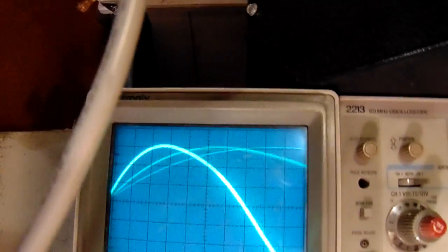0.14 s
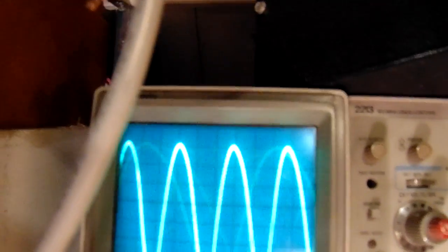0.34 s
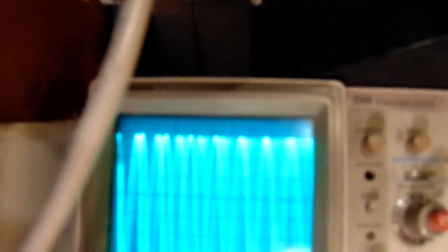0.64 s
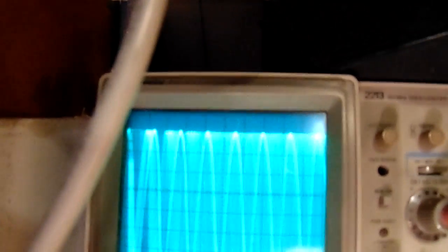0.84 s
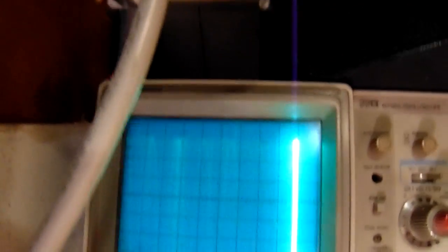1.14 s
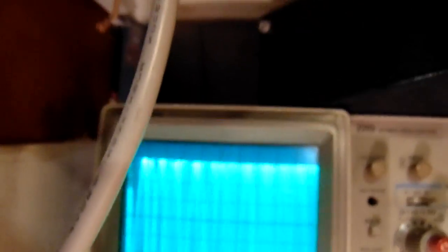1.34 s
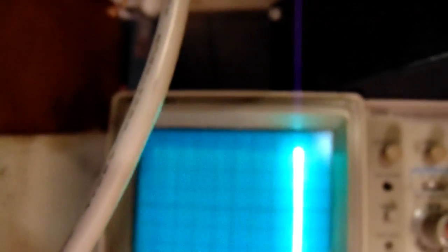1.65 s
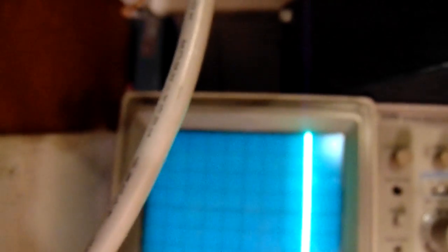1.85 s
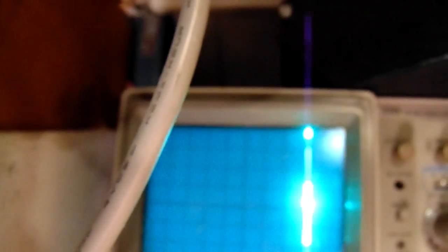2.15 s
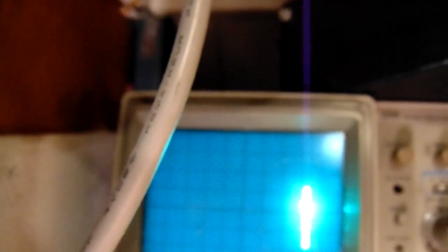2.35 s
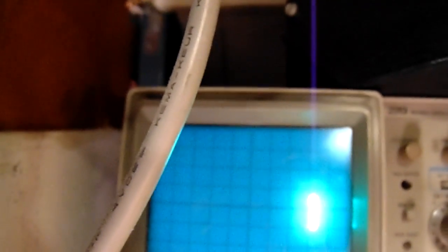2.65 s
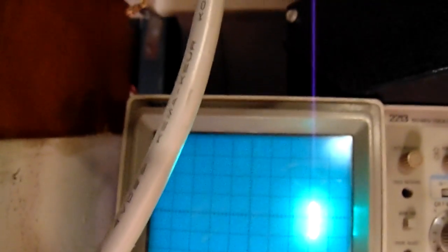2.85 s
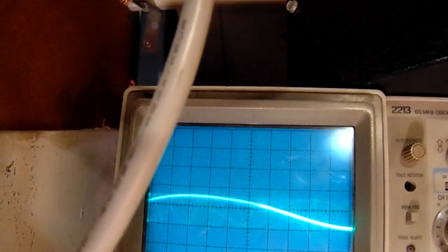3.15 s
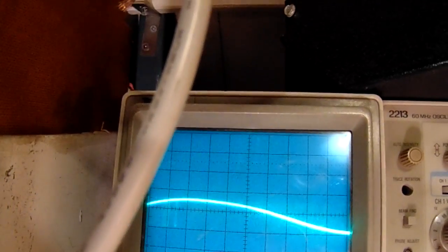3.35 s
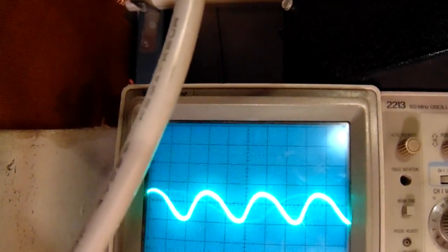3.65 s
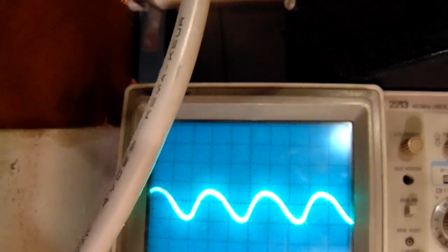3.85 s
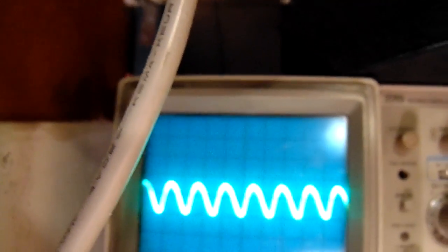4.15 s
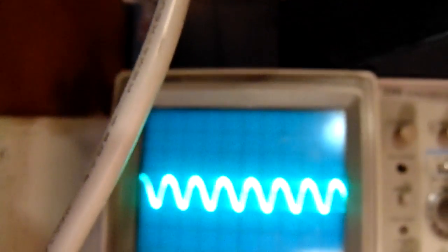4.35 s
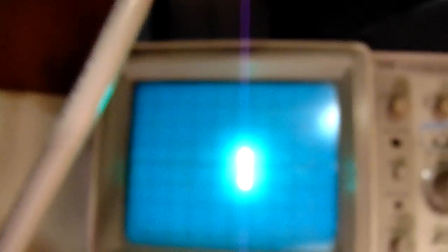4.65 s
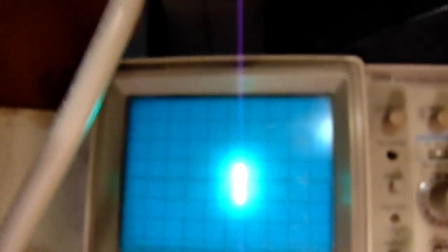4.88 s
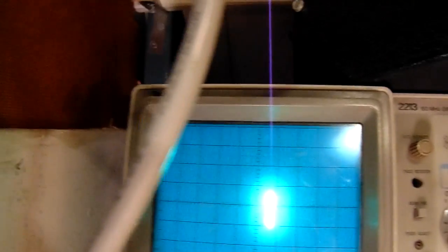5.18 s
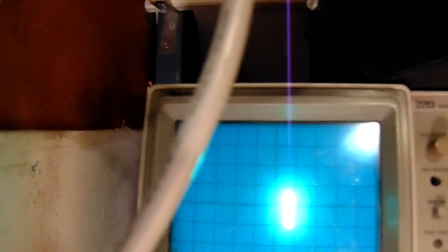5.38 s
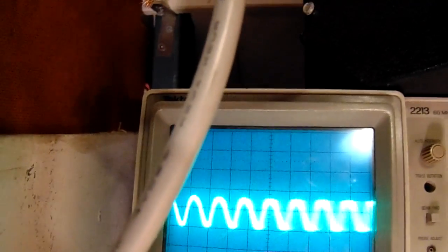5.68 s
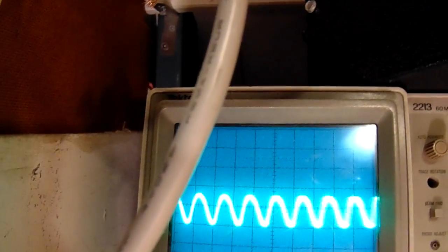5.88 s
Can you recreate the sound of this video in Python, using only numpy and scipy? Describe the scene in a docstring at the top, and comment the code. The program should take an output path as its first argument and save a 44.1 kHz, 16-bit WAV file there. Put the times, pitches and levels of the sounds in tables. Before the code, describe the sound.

Stiff detented knobs on electronic test equipment snap in small irregular groups, metal case ringing, over faint motor flutter and room noise in a quiet workshop.

```python
"""Rotary switches in a quiet workshop

Two detented oscilloscope switches are turned, close by: each step scrapes, snaps and rings the panel and metal case.
Filtered noise makes the dense panel ring; decaying sines make the spring, the case and the pings of touched parts.
Fingertips tick on the knobs and rub their ridges; repeated kicks make a small motor flutter on and off.
Faint room noise and a thin whine, both shaped from noise, lie beneath."""
import sys
import numpy as np
from scipy import signal
from scipy.io import wavfile
from scipy.ndimage import uniform_filter1d

SR = 44100
rng = np.random.default_rng(int(sys.argv[2]) if len(sys.argv) > 2 else 0)


def to_wav(sig):
    """Store sig (one row per channel, or 1-D mono) as 16-bit WAV at the path in sys.argv[1].

    Samples outside -1..1 are clipped; the rate is SR.
    """
    pcm = np.clip(np.atleast_2d(sig), -1, 1) * 32767
    pcm = np.round(pcm).astype(np.int16)
    wavfile.write(sys.argv[1], SR, pcm.T)  # frames by channels


N = 265437

TIME = np.arange(N) / SR  # s
AGE = TIME[:SR // 2]  # s since the start of one event
CUTOFF_HZ = 14200
# edges and centres of the noise bands: (pitch_hz)
EDGES = 20 * 2 ** np.linspace(0, 9.6, 27)
CENTRES = np.sqrt(EDGES[1:] * EDGES[:-1])


def from_db(db):
    """Decibels to gain."""
    return 10 ** (np.asarray(db) / 20)


def rms_one(x):
    """Scale each row to an rms of one."""
    return x / np.sqrt(np.mean(x ** 2, axis=-1, keepdims=True) + 1e-20)


def band_pass(x, low_hz, high_hz, order=2):
    """Keep the range between two frequencies."""
    sos = signal.butter(order, [low_hz, high_hz], "band", fs=SR, output="sos")
    return signal.sosfilt(sos, x)


def add(out, s, sound):
    """Mix a sound in at time s."""
    start = max(round(s * SR), 0)
    out[start:start + len(sound)] += sound[:max(N - start, 0)]


def at_bands(points):
    """Read (Hz, value) points at the band centres, along a logarithmic pitch axis."""
    hz, value = np.transpose(points)
    return np.interp(np.log(CENTRES), np.log(hz), value)


def band_gains(colour):
    """Gain per band for a spectrum in dB per Hz, with a total power of one."""
    gain = from_db(at_bands(colour)) * np.sqrt(np.diff(EDGES))
    return (gain / np.linalg.norm(gain))[:, None]


def noise_bands(run_in=SR // 2):
    """Steady noise in each band; neighbours come from different white noise, so they are unrelated."""
    white = rng.standard_normal((2, N + run_in))
    bands = []
    for k in range(len(CENTRES)):
        band = band_pass(white[k % 2], EDGES[k], EDGES[k + 1])
        bands.append(band[run_in:])  # drop the filter's start-up
    return rms_one(np.array(bands))


def sweep_switch(bands, impact_db=16, middle_db=-0.4):
    """A stiff detent: hard snap, singing spring, hollow knock of the case; a hard flick makes the knob judder."""
    # steps of the sweep-time switch: (start_s, level_db, hand_weight_db, snap_length_s)
    steps = [(0.2537, -22, 6.5, 0.0072), (.3194, -19.5, 7, 0.0033), (.449, -23, 3.5, 0.0043),
             (0.6406, -23.5, 4, 0.0073), (3.144, -18, -1, 0.0067), (3.1688, -18, -4, 0.0031),
             (3.2008, -21, -2, 0.0075), (3.5532, -21, 3.5, 0.0047), (3.722, -23.5, 1, 0.0079),
             (4.031, -23, 3.5, 0.0055)]
    # colour of the panel under this switch: (pitch_hz, level_db per Hz)
    panel_colour = [(150, -10), (220, -8.5), (400, 0.5), (620, -4.5), (900, 1), (1300, -11), (1900, -1),
                    (3000, -3.5), (4600, 3.5), (6500, 1), (9000, 3), (13500, 2.5)]
    # modes of the spring and shaft: (pitch_hz, level_db)
    spring_modes = [(4430, -14.5), (5367, -9), (5877, -9), (6663, -10), (7102, -15), (8732, -3),
                    (9763, -11), (9994, -6), (11181, -6), (13237, -9)]
    usual_step_db, spring_t60_s = -21, 0.06
    # the knock grows less than the snap does, and a heavy hand damps it
    knock_db, knock_follows, knock_damping = -20, 0.41, 0.57  # dB at the usual step, dB per dB, dB per dB
    # the judder grows quickly with a harder flick
    judder_db, judder_growth = -16.5, 4  # dB against the usual step, dB per dB
    out = np.zeros(N)
    for s, level_db, weight_db, snap_s in steps:
        force_db = level_db - usual_step_db
        ring = dense_ring(bands, snap_s, rise_s=0.00062, build_cycles=2.9, room_db=-40.5, room_t60=0.55)
        panel = (step_colour(panel_colour, middle_db, weight_db) * ring).sum(0)
        spring = sum(from_db(db) * mode(hz, spring_t60_s, build_s=0.0035) for hz, db in spring_modes)
        snap = from_db(impact_db) * contacts(snap_s)
        shiver = from_db(judder_db + judder_growth * force_db) * judder()
        knock_level_db = knock_db + knock_follows * force_db - knock_damping * weight_db
        knock = from_db(knock_level_db) * case_knock()
        add(out, s, from_db(level_db) * (panel + spring + snap + shiver) + knock)
    return out


def judder(hz=1650, peak_s=0.011, width_s=0.0044):
    """Flicked hard, the knob shivers on its shaft for a few milliseconds."""
    swell = np.exp(-((AGE - peak_s) / width_s) ** 2)
    return swell * np.sin(2 * np.pi * (hz * AGE + rng.random()))


def gain_switch(bands, impact_db=10, squeak_db=-3, knock_db=-8, middle_db=4.0):
    """A softer detent: a longer scrape with a squeak in it and little knock."""
    # steps of the gain switch: (start_s, level_db, hand_weight_db, snap_length_s)
    steps = [(1.8665, -25, 5, 0.0076), (2.1953, -24.5, -0.5, 0.01), (2.267, -25, -1, 0.00665),
             (2.4714, -25.5, 2.5, 0.0079)]
    # colour of the panel under this switch: (pitch_hz, level_db per Hz)
    panel_colour = [(150, -25), (220, 3.5), (350, -2), (550, -3.5), (900, 1), (1400, -10), (2000, 1.5),
                    (2800, -2), (4500, 2.5), (6500, 5), (8500, 2), (11500, 7), (14000, -1.5)]
    out = np.zeros(N)
    for s, level_db, weight_db, snap_s in steps:
        ring = dense_ring(bands, snap_s, rise_s=0.0015, build_cycles=1.2, room_db=-31, room_t60=0.2)
        panel = (step_colour(panel_colour, middle_db, weight_db) * ring).sum(0)
        squeak = from_db(squeak_db) * chirp(1.775 * snap_s)
        snap = from_db(impact_db) * contacts(snap_s)
        knock = from_db(knock_db + weight_db) * case_knock()
        add(out, s, from_db(level_db) * (panel + knock + squeak + snap))
    return out


def chirp(length_s, low_hz=2600, high_hz=5500, rough=0.122):
    """The sprung ball rubs over a tooth: a brief rough squeak that dips in pitch and climbs again."""
    travel = np.minimum(AGE / length_s, 1)
    wobble = rms_one(uniform_filter1d(rng.standard_normal(len(AGE)), size=20))
    dip_hz = low_hz + (high_hz - low_hz) * (2 * travel - 1) ** 2
    hz = dip_hz * (1 + rough * wobble)
    return np.sin(np.pi * travel) * np.sin(2 * np.pi * np.cumsum(hz) / SR)


def contacts(snap_s, per_s=900, low_hz=3500):
    """The detent lands and the wafer contacts chatter: a few bare, bright impacts."""
    chatter = rng.random(len(AGE)) < per_s / SR
    hits = chatter * rng.uniform(-0.28, 1, len(AGE)) * np.exp(-AGE / snap_s)
    hits[round(rng.uniform(.0005, .002) * SR)] = 1  # the landing itself
    return band_pass(hits, low_hz, CUTOFF_HZ)


def step_colour(colour, middle_db, low_db):
    """The grip of the hand changes how strongly a step shakes the low and middle range of the panel."""
    grip = [(300, 0), (900, low_db), (1700, middle_db), (3500, middle_db), (8000, 0)]  # Hz, dB
    return band_gains(colour) * from_db(at_bands(grip))[:, None]


def dense_ring(bands, snap_s, rise_s, build_cycles, room_db, room_t60):
    """Countless panel modes: fed while the contact lasts, then dying into a faint room tail."""
    # how long panel and case go on ringing: (pitch_hz, t60_s)
    ring_time = [(200, 0.36), (500, 0.22), (1000, 0.14), (2000, 0.093), (5000, 0.067), (14000, 0.06)]
    build_s = rise_s + build_cycles / CENTRES[:, None]  # low bending waves arrive late
    build = 1 - np.exp(-AGE / build_s)
    free_s = np.maximum(AGE - snap_s, 0)
    panel_decay = from_db(-60 * free_s / at_bands(ring_time)[:, None])
    room_decay = from_db(room_db - 60 * free_s / room_t60)
    return stretch(bands) * build * (panel_decay + room_decay)


def stretch(bands):
    """A random half second of banded noise."""
    start = rng.integers(N - len(AGE))
    return bands[:, start:start + len(AGE)]


def case_knock():
    """The sheet-metal case answers a step with a hollow knock, its modes swelling a little later."""
    # modes of the case: (pitch_hz, level_db, t60_s, build_up_s)
    case_modes = [(223.7, -17, 0.1, 0.0044), (262.2, -9.5, .16, 0.02), (477.7, 6, 0.099, 0.024),
                  (704, -25.5, 0.35, 0.0077), (773, -18, 0.082, 0.0033), (940, -15.5, 0.12, 0.017),
                  (1275, -20, 0.16, 0.0047)]
    return sum(from_db(db) * mode(hz, t60, build_s) for hz, db, t60, build_s in case_modes)


def mode(hz, t60, build_s):
    """One resonance that swells and dies, a little different in level and phase on every blow."""
    blow_db = rng.normal(0, 1.2)
    swell = (1 - np.exp(-AGE / build_s)) ** 2
    decay = from_db(blow_db - 60 * AGE / t60)
    return swell * decay * np.sin(2 * np.pi * (hz * AGE + rng.random()))


def fingers(bands, tick_db=7, tick_hz=12000, ping_db=6):
    """Light touches ring the panel and ping the touched part; the tilt makes them dull or bright."""
    # touches on the knobs, dull pad to bright nail: (start_s, level_db, tilt_db_per_octave, ping_hz)
    touches = [(0.0443, -53.5, -.5, 2080), (0.1121, -53, 1, 7400), (0.7556, -53.5, 2, 2230),
               (0.9953, -53, -1, 1670), (1.1312, -51, 5.5, 13700), (1.4323, -57.5, 0, 2800),
               (1.4719, -51.5, 1.5, 10900), (1.5721, -52, 6.5, 7650), (2.6278, -58.5, 1.3, 1430),
               (2.688, -56.5, 0, 7440), (2.799, -54.5, -2, 1720), (2.9643, -54, .3, 7170),
               (3.0718, -55, 0.5, 2980), (3.5097, -60, -4, 1666), (3.8124, -62, -5, 950),
               (5.0282, -56, -2.5, 3410), (5.0739, -63, 3.5, 13200), (5.1854, -56, 0.5, 8600),
               (5.2958, -51, 4, 12800), (5.5019, -53.5, 4, 10840), (5.5339, -47.5, 0.7, 2054),
               (5.9106, -56, 0.7, 3530), (5.9522, -58.5, 5, 13500), (6.0044, -56, 2.7, 8560)]
    # colour of a touch before its tilt: (pitch_hz, level_db per band)
    touch_colour = [(150, -28), (700, -5), (1900, -6), (5500, -6.5), (11500, -4.5)]
    out = np.zeros(N)
    for s, level_db, tilt, ping_hz in touches:
        colour = from_db(at_bands(touch_colour)) * tilted(tilt, CENTRES)
        ring = dense_ring(bands, snap_s=0.0036, rise_s=0.00018, build_cycles=0.83, room_db=-26.5, room_t60=0.61)
        panel = (colour[:, None] * ring).sum(0)
        ping = from_db(ping_db) * tilted(tilt, ping_hz) * mode(ping_hz, t60=0.068, build_s=0.00028)
        tick = from_db(tick_db) * tilted(tilt, tick_hz) * contacts(snap_s=.002)
        add(out, s, from_db(level_db) * (panel + ping + tick))
    return out


def tilted(tilt, hz, pivot_hz=3000):
    """Gain at hz of a slope in dB per octave."""
    return from_db(tilt * np.log2(hz / pivot_hz))


def rubs(slips_per_s=2500, spread=1.7):
    """Fingertip skin catches and slips on the knurled ridges: a faint patter of tiny clicks."""
    # strokes over the knobs: (start_s, length_s, level_db, centre_hz)
    strokes = [(0.508, 0.048, -54, 11800), (1.399, .11, -58, 9000), (2.682, 0.31, -68, 735),
               (2.892, 0.26, -59, 4930), (3.295, 0.11, -61.5, 3800), (5.546, .09, -58, 1710),
               (5.668, 0.091, -53.5, 3100)]
    out = np.zeros(N)
    for s, length_s, level_db, hz in strokes:
        slips = (rng.random(len(AGE)) < slips_per_s / SR) * rng.standard_normal(len(AGE))
        grain = band_pass(slips, hz / spread, min(hz * spread, CUTOFF_HZ), order=1)
        stroke = np.sqrt(np.abs(np.sin(np.pi * np.minimum(AGE / length_s, 1))))
        add(out, s, from_db(level_db) * stroke * rms_one(grain))
    return out


def small_motor(rise_s=0.0019, vary_db=1.0, drive_db=-3):
    """Kicks about 30 times a second flutter; the housing rings the same way each time."""
    # modes of the motor's housing: (pitch_hz, level_db, t60_s)
    housing_modes = [(281, -2, 0.039), (637, 4, 0.023), (811.5, -1, 0.055), (1054, -1, 0.037)]
    first_kick_s, kicks_per_s, late_s = 0.016, 30, 0.0036
    ring = sum(from_db(db - 60 * AGE / t60) * np.sin(2 * np.pi * hz * AGE) for hz, db, t60 in housing_modes)
    housing = (1 - np.exp(-AGE / rise_s)) * ring
    kicks = np.zeros(N)
    for due_s in np.arange(first_kick_s, TIME[-1], 1 / kicks_per_s):
        s = due_s + late_s * min(rng.exponential(), 2)  # each kick comes a little late
        add(kicks, s, from_db(rng.normal(0, vary_db, 1)))
    flutter = signal.fftconvolve(kicks, housing)[:N]
    buzz = signal.sosfilt(signal.butter(8, 1200, fs=SR, output="sos"), flutter)
    return rms_one(buzz) * from_db(drive_db) * motor_spells()


def motor_spells(fade_s=0.06, idle_db=-75):
    """Gain of the motor: it fades in, holds and fades out in each spell, and barely stirs in between."""
    # spells of motor flutter: (start_s, stop_s, level_db ahead of the drive gain)
    spells = [(0, 0.69, -57), (0.717, 1.6, -55), (2.577, 3.43, -57.5), (3.598, 4.749, -55),
              (4.815, 5.516, -57.5)]

    def fade(s):
        """A straight rise from 0 to 1 centred on s."""
        return np.clip((TIME - s) / fade_s + .5, 0, 1)
    gain = sum(from_db(db) * (fade(start) - fade(stop)) for start, stop, db in spells)
    return np.maximum(gain, from_db(idle_db))


def workshop(room_db=-56.5, whine_db=-75.5, whine_hz=12807):
    """Even room noise and the thin whine of a power supply, a 50 Hz wide sliver of noise."""
    # colour of the room noise: (pitch_hz, level_db per Hz)
    room_colour = [(12, -35), (20, -1.5), (98, -1.5), (346, -6), (481, -6.5), (551, -7.5), (1060, -13),
                   (1290, -14), (1950, -16), (2230, -15.5), (4550, -19.5), (12900, -22.5), (14000, -24.5)]
    air = rms_one((band_gains(room_colour) * noise_bands()).sum(0))
    whine = rms_one(band_pass(rng.standard_normal(N), whine_hz - 25, whine_hz + 25))
    return from_db(room_db) * air + from_db(whine_db) * whine


def scene():
    """All layers summed to one channel; switches and fingers share the same banded noise."""
    bands = noise_bands()
    switches = sweep_switch(bands) + gain_switch(bands)
    hands = fingers(bands) + rubs()
    return (switches + hands + small_motor() + workshop())[None]


def record(dry):
    """The top is cut steeply above the cutoff."""
    return signal.sosfilt(signal.ellip(10, .2, 70, CUTOFF_HZ, fs=SR, output="sos"), dry)


dry = scene()
out = record(dry)
to_wav(out)
```